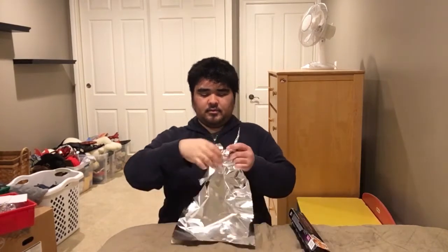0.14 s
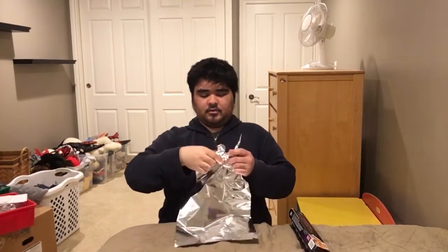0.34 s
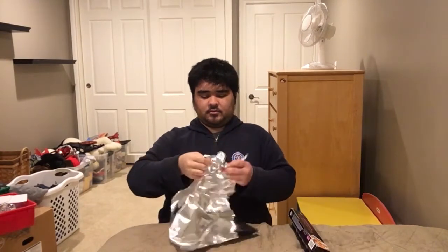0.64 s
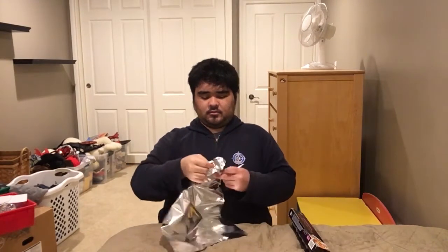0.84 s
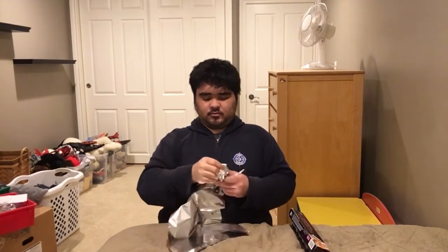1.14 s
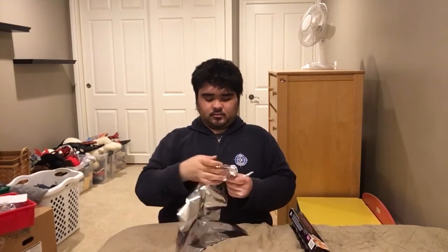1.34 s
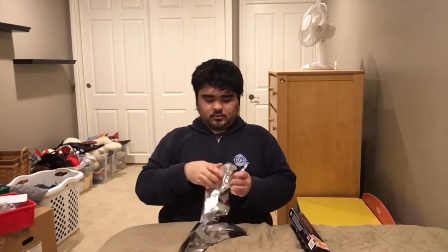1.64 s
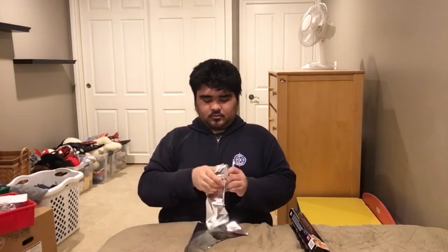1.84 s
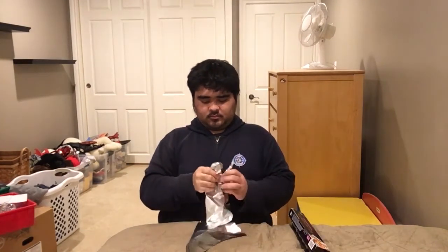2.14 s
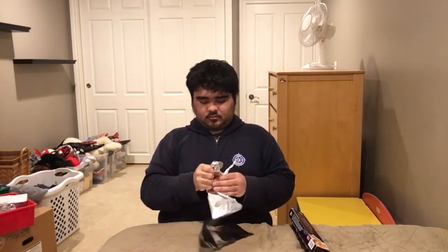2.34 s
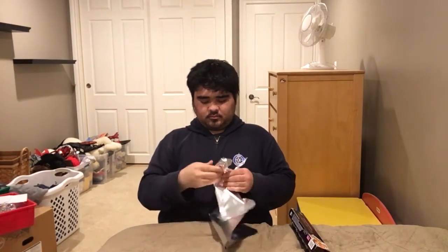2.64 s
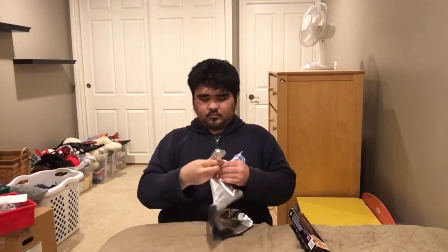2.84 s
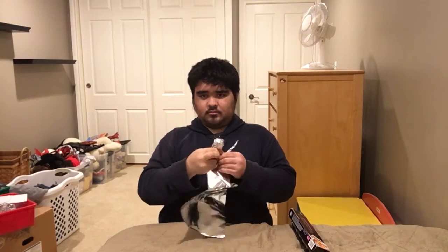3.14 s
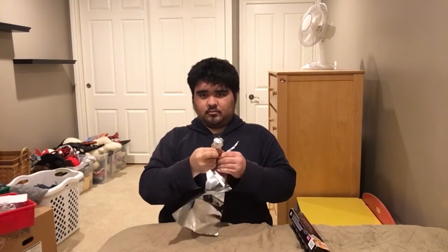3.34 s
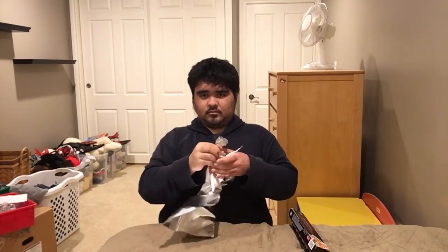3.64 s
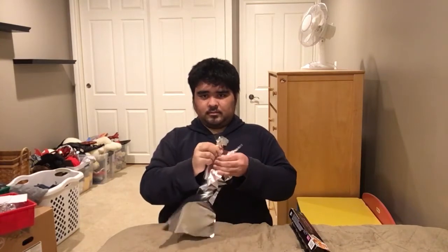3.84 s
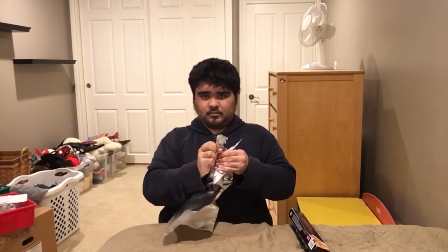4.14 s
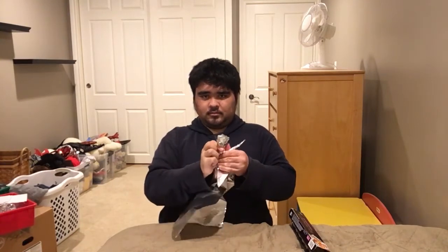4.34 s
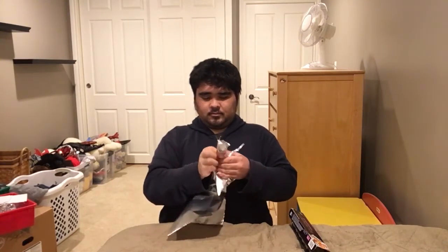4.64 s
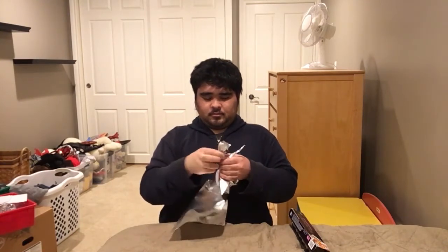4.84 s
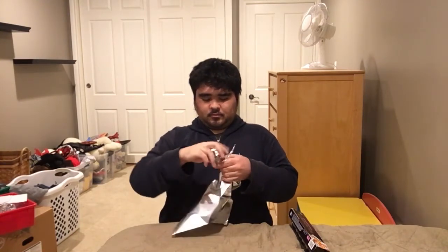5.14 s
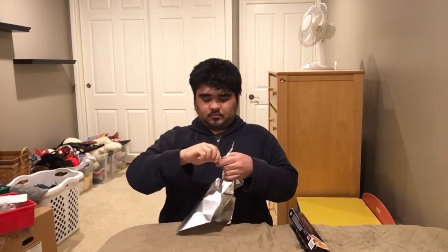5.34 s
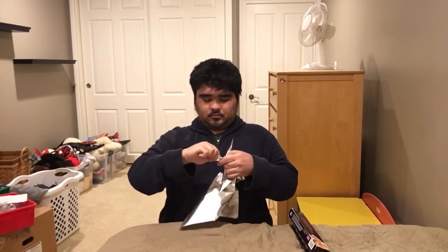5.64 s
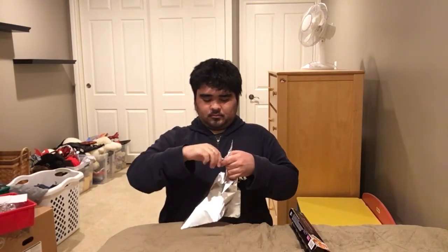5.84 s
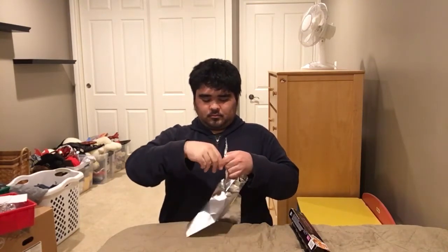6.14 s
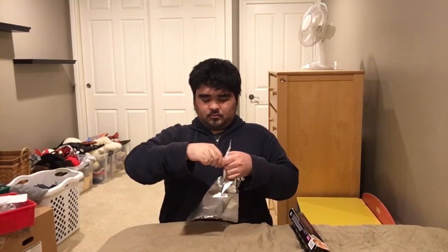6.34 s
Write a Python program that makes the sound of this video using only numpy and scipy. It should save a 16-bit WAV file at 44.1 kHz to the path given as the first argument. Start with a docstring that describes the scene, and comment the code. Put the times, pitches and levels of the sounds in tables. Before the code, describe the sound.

Aluminum foil is scrunched by hand in a carpeted bedroom, picked up from a little way off with short, diffuse room reflections and a faint low hum. From 0 to about 0.9 seconds the crinkling is loudest and densest, thousands of bright tiny clicks swelling with squeezes, with strong bursts near 0.2, 0.55 and 0.75. From 1 to 2.6 it continues briskly, with sharp crackles around 1.5 and 1.7 and the loose sheet flexing with a faint hollow wobble. Around 3 it drops back, then returns in separate twists, with small pitched pops between 3.2 and 3.6. Squeezes near 4 and 4.4 are followed by a cluster of little snaps up to 4.7 and a crisp burst at 4.75. After 5 it is thinner and quieter, with brief ticks and regrips; it nearly settles around 5.85, then light, fine crackles resume from 6.1 until the end at 6.5.

```python
"""Aluminium foil scrunched by hand

Two hands scrunch and twist the top of a sheet of foil in a carpeted bedroom, heard from a little way off.
Thousands of tiny creases buckle each second: random clicks, filtered by fold size, swell with each squeeze
and burst in avalanches. The loose sheet below flexes and wobbles to the same clicks; now and then a flat
facet snaps through with a short pitched pop. Noise reflections add the room, and filtered noise its faint hum."""
import sys
import numpy as np
from scipy import signal
from scipy.fft import rfft, irfft, next_fast_len
from scipy.io import wavfile
from scipy.ndimage import uniform_filter1d

SR = 44100
rng = np.random.default_rng(int(sys.argv[2]) if len(sys.argv) > 2 else 0)


def to_wav(s):
    """Save 16-bit WAV."""
    ch = np.atleast_2d(s).T  # columns
    pcm = np.round(np.clip(ch, -1, 1) * 32767)  # PCM
    wavfile.write(sys.argv[1], SR, pcm.astype(np.int16))


N = 287091
TIME = np.arange(N) / SR   # seconds


def from_db(db):
    """Decibels to gain."""
    return 10 ** (np.asarray(db) / 20)


def rms_one(x):
    """Scale to unit rms."""
    return x / np.sqrt(np.mean(x ** 2) + 1e-20)


def in_time(rows):
    """Draw each column of a breakpoint table as a curve, one value per sample."""
    s, *columns = np.transpose(rows)
    return [np.interp(TIME, s, column) for column in columns]


def at_hz(points, hz):
    """Read a frequency table on a log-frequency axis."""
    freqs, values = np.transpose(points)
    return np.interp(np.log(np.maximum(hz, 1)), np.log(freqs), values)


def coloured(x, spectrum):
    """Shape x with a causal (minimum-phase) filter; several tracks share one overall rms of 1."""
    size = 2 * next_fast_len(N // 2 + SR // 10, True)
    hz = np.arange(size // 2 + 1) * SR / size
    # folding the cepstrum onto positive time makes the filter minimum-phase
    cepstrum = irfft(np.log(from_db(at_hz(spectrum, hz))))
    cepstrum[1:size // 2] *= 2
    cepstrum[size // 2 + 1:] = 0
    response = np.exp(rfft(cepstrum))
    return rms_one(irfft(rfft(x, size) * response)[..., :N])


def bands(count=14):
    """Centre Hz, width Hz and band-pass of neighbouring bands from 80 Hz to 19 kHz."""
    edges = np.geomspace(80, 19000, count + 1)
    return [(np.sqrt(lo * hi), hi - lo, signal.butter(2, [lo, hi], "band", fs=SR, output="sos"))
            for lo, hi in zip(edges, edges[1:])]


def arch(start_s, length_s):
    """One movement of the fingers: a half sine that swells and eases off."""
    return np.sin(np.pi * np.clip((TIME - start_s) / length_s, 0, 1))


def strokes(rows):
    """Power of smooth strokes, one track per level column."""
    return sum(np.outer(from_db(levels_db) ** 2, arch(start_s, length_s))
               for start_s, length_s, *levels_db in rows)


def buckles(per_s, spread_db, colour_db, even_s):
    """Random clicks, many small and a few large, each coloured at random; nearly white and steady overall."""
    at = np.flatnonzero(rng.random(N) < per_s / SR)
    sizes = from_db(spread_db * np.minimum(rng.exponential(1, N)[at], 3.5))
    out = np.zeros(N)
    for _, width, band_pass in bands():
        # a random sign and gain per click in each band gives every click its own colour
        chance = rng.uniform(-1, 1, N)[at]
        clicks = np.zeros(N)
        clicks[at] = sizes * np.sign(chance) * from_db(colour_db * np.abs(chance))
        out += np.sqrt(width) * rms_one(signal.sosfilt(band_pass, clicks + 1e-18))
    # the hands feed in energy steadily, however it is shared among the clicks
    power = np.abs(uniform_filter1d(out ** 2, int(even_s * SR) + 1))
    return out / np.sqrt(power + 1e-9)


def folds(clicks, spectrum, steady, rush, steady_db, rush_db):
    """One size of fold: scattered clicks follow the steady power, denser ones the power of a rush."""
    scattered, dense = coloured(np.array(clicks), spectrum)
    return scattered * np.sqrt(steady) * from_db(steady_db) + dense * np.sqrt(rush) * from_db(rush_db)


# the fingers slacken to take a new hold: start_s, length_s, depth_db
REGRIPS = [(0.97, 0.059, 1.5), (1.371, 0.086, 3), (1.847, 0.054, 2.5), (2.243, 0.048, 1.5),
           (2.613, 0.056, 3.8), (3.87, 0.072, 2.5), (5.212, 0.031, 6.5), (5.256, 0.058, 6),
           (6.02, 0.055, 2.4)]
CATCHES_PER_S, CATCH_DB = 40, 0.76   # CATCH_DB is the spread of the random swings


def catching():
    """Swings of the grip in dB: the foil catches and yields at random and rests at each change of hold."""
    catches = CATCH_DB * np.interp(TIME * CATCHES_PER_S, np.arange(N), rng.standard_normal(N))
    return catches - sum(depth_db * arch(start_s, length_s) for start_s, length_s, depth_db in REGRIPS)


# the fingers' steady grip between strokes, before trims: time_s, creasing_db, sheet_flexing_db
GRIP = [(0.0, -28, -45), (0.35, -31.5, -47), (1.12, -33.5, -47), (1.4, -32.5, -47), (2.55, -34, -47),
        (2.88, -35.8, -48), (3.07, -40, -53), (3.25, -33.5, -52.5), (3.48, -39.5, -51.5),
        (3.68, -37.5, -51), (4.3, -34.5, -47), (4.55, -43, -56.5), (4.8, -36, -51), (5.68, -38, -56.5),
        (5.8, -43, -56), (5.92, -42.5, -55.9), (6.15, -34.5, -52.5), (6.51, -42, -58)]
# squeezes and twists, before trims: start_s, length_s, creasing_db, finest_wrinkles_db
SQUEEZES = [(-0.062, 0.21, -33.5, -36.5), (0.154, 0.11, -31.5, -34.5), (0.475, 0.11, -30.5, -36),
            (0.714, 0.28, -30, -34), (1.166, 0.15, -31.5, -32), (1.46, 0.1, -31.5, -46),
            (1.578, 0.22, -34, -35.5), (1.896, 0.2, -34.5, -41.0), (2.179, 0.066, -29.5, -35),
            (2.292, 0.13, -35, -37.5), (2.654, 0.084, -31.5, -34), (2.782, 0.071, -42, -38.5),
            (2.895, 0.13, -35.5, -39.8), (3.579, 0.049, -36, -39.5), (3.649, 0.084, -34.5, -43),
            (3.95, 0.14, -30, -38), (4.209, 0.17, -35.5, -40.4), (4.674, 0.048, -35.5, -42.3),
            (4.851, 0.045, -36.0, -37.5), (5.04, 0.04, -40, -52), (5.319, 0.043, -40.4, -46.4),
            (5.477, 0.061, -38.4, -46), (5.945, 0.052, -34.5, -37.7), (6.142, 0.072, -40, -39.5),
            (6.276, 0.041, -33, -36), (6.366, 0.049, -35.5, -38), (6.431, 0.074, -38.0, -42)]
# a firmer grip reaches finer wrinkles: their level at a medium grip, and dB gained per dB of creasing
MEDIUM_GRIP_DB, WRINKLE_DB, WRINKLE_FOLLOWS = -34.5, -43.5, 1.57


def working_hands():
    """Powers of grip and squeezes: the grip's coarse, fine and sheet tracks, then the squeezes' pair."""
    grip_db, sheet_db = in_time(GRIP)
    catch_db = catching()
    wrinkle_db = WRINKLE_DB + WRINKLE_FOLLOWS * (grip_db + catch_db - MEDIUM_GRIP_DB)
    grips = [from_db(db) ** 2 for db in (grip_db + catch_db, wrinkle_db, sheet_db + catch_db)]
    return grips, strokes(SQUEEZES)


# a ridge gives way in an avalanche of creases, before trims:
# start_s, creasing_db, finest_wrinkles_db, fade_s (to 1/e in amplitude)
AVALANCHES = [(0.013, -28, -30.5, 0.015), (0.231, -25, -36.0, 0.005), (0.363, -39, -39, 0.014),
              (0.534, -24.5, -33, 0.019), (0.588, -26, -28.5, 0.016), (0.655, -32.5, -41, 0.017),
              (0.74, -23.5, -35.5, 0.016), (0.836, -29, -34, 0.013), (1.038, -28, -37, 0.014),
              (1.242, -30, -37, 0.014), (1.431, -31, -48, 0.021), (1.506, -23.5, -33, 0.012),
              (1.6, -29.5, -32.5, 0.019), (1.719, -25, -32, 0.028), (1.83, -31.3, -37, 0.024),
              (2.077, -31, -36.1, 0.0097), (2.358, -31.5, -36, 0.015), (2.507, -32, -43, 0.021),
              (2.557, -27.5, -38, 0.0097), (2.679, -32, -34, 0.0045), (2.942, -34.5, -39, 0.023),
              (3.107, -40.3, -41, 0.006), (3.161, -31.5, -35, 0.018), (3.334, -33.0, -47.6, 0.012),
              (3.536, -32, -38.5, 0.017), (3.764, -33, -39.4, 0.014), (4.129, -34, -35.8, 0.014),
              (4.297, -38, -45, 0.021), (4.438, -30.5, -40.5, 0.019), (4.628, -34.5, -53, 0.018),
              (4.753, -29, -38.5, 0.017), (4.976, -33.5, -38.5, 0.012), (5.063, -35.3, -35, 0.003),
              (5.24, -36, -41, 0.0055), (5.28, -33, -41, 0.005), (5.384, -35, -41.5, 0.017),
              (5.453, -34.4, -42.2, 0.006), (5.61, -35.5, -44, 0.028), (5.695, -34, -41, 0.023),
              (6.474, -36, -47, 0.018)]
AVALANCHE_RISE_S = 0.0018


def avalanches():
    """Power of the collapsing ridges, coarse and fine: each leaps to its peak and dies away."""
    power, age = np.zeros((2, N + SR)), TIME[:SR // 5]
    for start_s, *levels_db, fade_s in AVALANCHES:
        start = int(start_s * SR)
        shape = (1 - np.exp(-age / AVALANCHE_RISE_S)) * np.exp(-age / fade_s)
        power[:, start:start + len(age)] += np.outer(from_db(levels_db), shape / shape.max()) ** 2
    return power[:, :N]


# relative colours of the creases, from large to finest: freq_hz, density_db_per_hz
LARGE_CREASE = [(650, -38.5), (1100, -3.5), (1340, 2), (1620, 1.5), (1770, 5), (2420, 4.5), (2970, 7),
                (4430, 2.5), (4900, -8), (6370, -23), (10800, -120)]
SMALL_CREASE = [(2880, -33), (4900, -2), (5660, 1.5), (6750, -3.5), (7400, -11.5), (9620, -17.5),
                (16300, -120)]
WRINKLE = [(4350, -28), (7400, -12.5), (9340, -2), (10500, -8), (13200, -5), (15100, -7), (16000, -14)]


def creasing(clicks, coarse, fine, rush, fine_rush):
    """Folds of three sizes buckle together, the smaller ones brighter."""
    large = folds(clicks, LARGE_CREASE, coarse, rush, steady_db=-1.28, rush_db=0.3)
    # small creases lie midway in dB between the large ones and the wrinkles
    small_steady, small_rush = np.sqrt(coarse * fine), np.sqrt(rush * fine_rush)
    small = folds(clicks, SMALL_CREASE, small_steady, small_rush, steady_db=-1.2, rush_db=-1.1)
    wrinkles = folds(clicks, WRINKLE, fine, fine_rush, steady_db=-0.02, rush_db=1.8)
    return large + small + wrinkles


# the loose sheet below the hands bends, before trims: start_s, length_s, flexing_db, hollow_wobble_db
BENDS = [(-0.002, 0.045, -41.5, -45), (0.162, 0.08, -49, -45.5), (0.527, 0.044, -39.5, -51),
         (0.691, 0.21, -53, -46), (0.998, 0.16, -50.5, -43), (1.703, 0.043, -43, -47),
         (1.897, 0.15, -43, -51), (2.213, 0.037, -41, -52.9), (2.344, 0.082, -42.5, -70),
         (2.5, 0.059, -43, -58), (2.663, 0.08, -45.5, -48), (3.228, 0.033, -46, -52.6),
         (3.308, 0.049, -46, -47.5), (3.524, 0.039, -47, -60), (3.836, 0.05, -51.3, -54),
         (3.978, 0.2, -46, -50), (4.188, 0.12, -47, -51.5), (4.431, 0.04, -55, -66),
         (4.621, 0.053, -44, -53), (4.75, 0.052, -48, -50.5), (6.072, 0.068, -54, -52)]
# relative colour of the flexing sheet: freq_hz, density_db_per_hz
FLEX = [(100, -39), (300, -13), (400, -1), (500, 2), (720, 0.5), (880, 5.5), (1080, -2.5), (1400, 1),
        (2400, -72.5)]
# relative hollow colour of its wobble: freq_hz, density_db_per_hz
WOBBLE = [(50, -22), (90, -12), (160, -8.5), (200, -13.5), (265, -2.5), (292, -4), (322, 4), (370, -2.5),
          (460, -6), (900, -60)]
# share of squeezes and avalanches that shakes the sheet, and of that shaking that makes it wobble
SHAKE_DB, WOBBLE_DB = -18, -9


def loose_sheet(clicks, sheet_grip, squeeze, rush):
    """Buckling shakes the hanging sheet, which flexes and wobbles hollowly; bends add denser bursts."""
    bend, hollow_bend = strokes(BENDS)
    shaken = sheet_grip + from_db(SHAKE_DB) ** 2 * (squeeze + rush)
    wobbling = shaken * from_db(WOBBLE_DB) ** 2
    flexing = folds(clicks, FLEX, shaken, bend, steady_db=-0.4, rush_db=0.0)
    wobble = folds(clicks, WOBBLE, wobbling, hollow_bend, steady_db=-0.5, rush_db=-0.9)
    return flexing + wobble


def crinkle():
    """The same buckles sound in the creases, shake the loose sheet and set off the finest wrinkles."""
    clicks = (buckles(per_s=5000, spread_db=2.5, colour_db=14.5, even_s=0.097),
              buckles(per_s=10000, spread_db=1.5, colour_db=12.5, even_s=0.0053))
    (grip, fine_grip, sheet_grip), (squeeze, fine_squeeze) = working_hands()
    rush, fine_rush = avalanches()
    # powers of grip and squeezes add
    creases = creasing(clicks, grip + squeeze, fine_grip + fine_squeeze, rush, fine_rush)
    return creases + loose_sheet(clicks, sheet_grip, squeeze, rush)


# relative colour of the room's low hum: freq_hz, density_db_per_hz
RUMBLE = [(20, -24), (40, -19), (52, 0), (58, 4.5), (66, -4), (80, -7), (120, -22), (250, -32), (1000, -14),
          (8000, -63)]
# its level before the trim: time_s, level_db
RUMBLE_LEVEL = [(0, -58), (.5, -64), (1.08, -61), (1.22, -54), (1.42, -58), (1.7, -55.5), (2.2, -60),
                (2.45, -62), (3.1, -63.5), (4.8, -66), (5.1, -64), (5.7, -64.5), (6.1, -63), (6.51, -64)]


def room_hum(trim_db):
    """Noise filtered to a low hum that rises and falls slowly."""
    level_db, = in_time(RUMBLE_LEVEL)
    return from_db(level_db + trim_db) * coloured(rng.standard_normal(N), RUMBLE)


# facets snapping through, the large ones with a low knock:
# start_s, level_db (ring before trim and room), pitch_hz (once settled), t60_s
POPS = [(1.0477, -20, 1650, 0.011), (1.451, -20, 1930, 0.013), (1.719, -27, 497, 0.025),
        (1.723, -29, 3220, 0.012), (2.0796, -18, 2180, 0.0094), (2.679, -33, 544, 0.022),
        (3.241, -34, 470, 0.024), (3.3013, -26, 1340, 0.016), (3.3348, -26, 1500, 0.014),
        (3.441, -34, 1940, 0.01), (3.4925, -30, 1330, 0.016), (3.539, -28, 1350, 0.018),
        (3.541, -31.5, 470, 0.03), (3.873, -23, 1730, 0.014), (4.209, -23, 1510, 0.0099),
        (4.2281, -20, 1410, 0.011), (4.2973, -20.5, 1820, 0.01), (4.3193, -24, 1410, 0.012),
        (4.442, -38.5, 480, 0.037), (4.5225, -26.5, 1550, 0.012), (4.5815, -32, 2660, 0.012),
        (4.5944, -31, 2910, 0.012), (4.627, -41, 362, 0.03), (4.641, -23.5, 1350, 0.026),
        (4.6674, -27, 1430, 0.016), (5.0796, -21, 1410, 0.012), (5.2576, -28, 1700, 0.012),
        (5.2826, -22, 5100, 0.006), (5.8647, -25, 2550, 0.013)]
POP_LOW_CUT_HZ = 240   # high-pass that keeps the onset of each ring free of bass


def pops(trim_db, glide, settle_s, tick_db):
    """A facet flips with a tick and rings a few cycles, its pitch sinking as it slackens."""
    out, age = np.zeros(N + SR), TIME[:SR // 20]
    settling = np.exp(-age / settle_s)
    for start_s, level_db, pitch_hz, t60_s in POPS:
        start = int(start_s * SR)
        phase = 2 * np.pi * np.cumsum(pitch_hz * (1 + glide * settling)) / SR
        ring = np.sin(phase) * from_db(-60 * age / t60_s)
        tick = from_db(tick_db) * rng.standard_normal(len(age)) * settling
        out[start:start + len(age)] += from_db(level_db + trim_db) * (ring + tick)
    low_cut = signal.butter(2, POP_LOW_CUT_HZ, "high", fs=SR, output="sos")
    return signal.sosfilt(low_cut, out[:N] + 1e-18)


# how long the reflections ring: freq_hz, t60_s
ROOM_T60 = [(200, 0.34), (1000, 0.25), (4000, 0.31), (8000, 0.36), (16000, 0.21)]


def reflections(gap_s):
    """A dense noise wash from walls and doors, each band dying at its own rate; unit energy."""
    age, tail = TIME[:SR // 2], 0
    for hz, _, band_pass in bands():
        decay = from_db(-60 * age / at_hz(ROOM_T60, hz))
        tail = tail + signal.sosfilt(band_pass, rng.standard_normal(len(age))) * decay
    # the wash builds up softly after the direct sound
    tail = tail * (1 - np.exp(-(age / gap_s) ** 2))
    return tail / np.linalg.norm(tail)


def bedroom(x, wet_db, gap_s, count):
    """Each facet faces another way, so the sound keeps shifting among several sets of reflections."""
    knots = np.arange(0, TIME[-1] + .01, .006)   # a new random balance every 6 ms
    shares = np.array([np.interp(TIME, knots, row) for row in rng.standard_normal((count, len(knots)))])
    shares /= np.linalg.norm(shares, axis=0)
    wash = sum(signal.oaconvolve(x * share, reflections(gap_s))[:N] for share in shares)
    return (x + from_db(wet_db) * wash) / np.hypot(1, from_db(wet_db))


def scene():
    """Foil in the room over a low hum, alike in both channels; the flat facets beam more directly."""
    foil = bedroom(crinkle(), wet_db=-2.5, gap_s=0.00056, count=6)
    hum = room_hum(trim_db=2.2)
    snaps = pops(trim_db=2.1, glide=0.14, settle_s=0.00035, tick_db=-17)
    facets = bedroom(snaps, wet_db=-6.0, gap_s=0.002, count=2)
    return np.tile(foil + hum + facets, (2, 1))


CUTOFF_HZ = 15800


def record(dry):
    """A steep elliptic low-pass cuts the top."""
    low_pass = signal.ellip(12, .1, 80, CUTOFF_HZ, fs=SR, output="sos")
    return signal.sosfilt(low_pass, dry)


dry = scene()
out = record(dry)
to_wav(out)
```